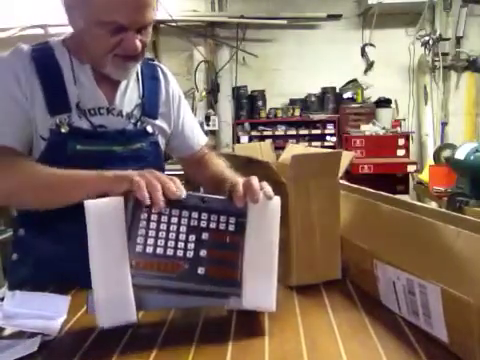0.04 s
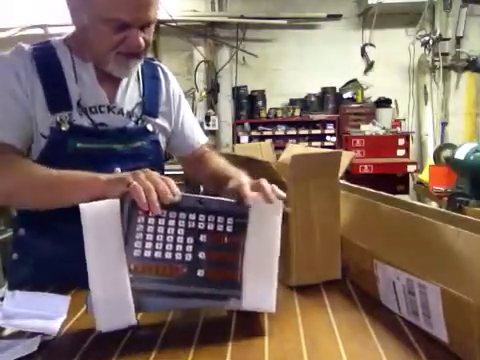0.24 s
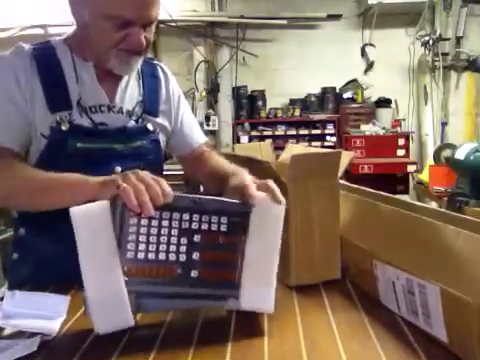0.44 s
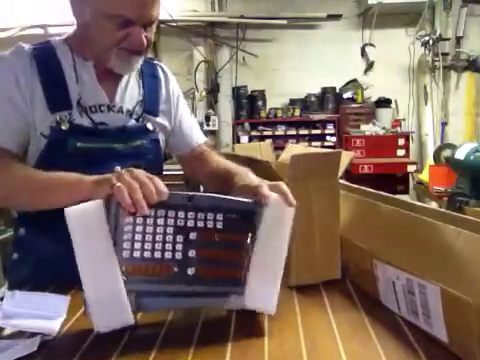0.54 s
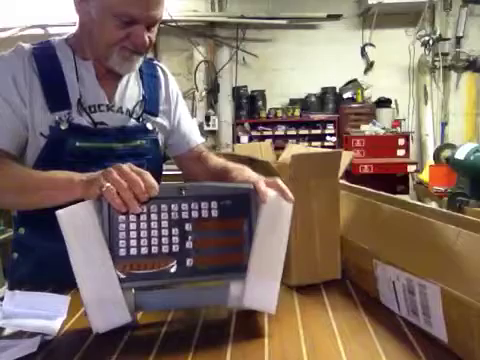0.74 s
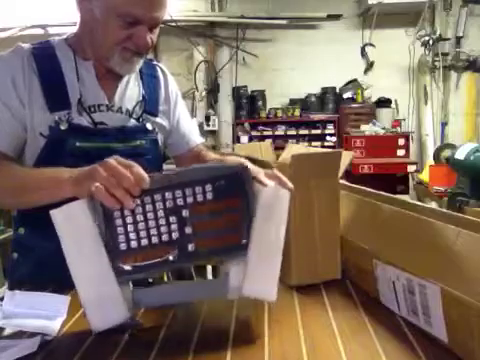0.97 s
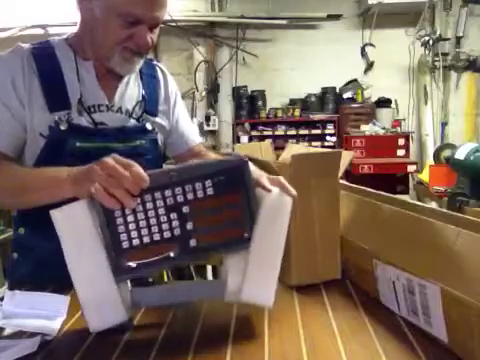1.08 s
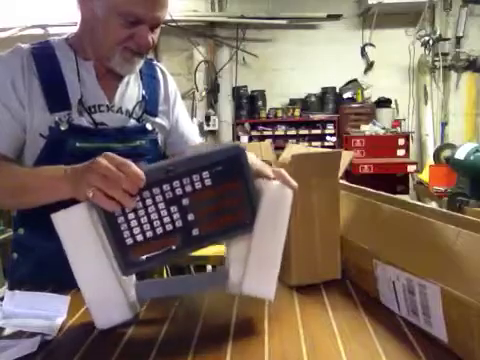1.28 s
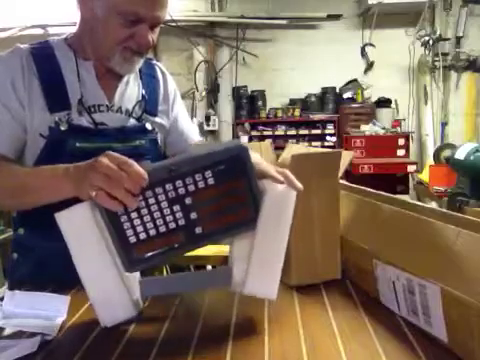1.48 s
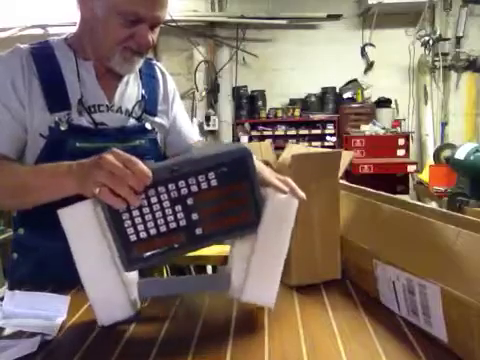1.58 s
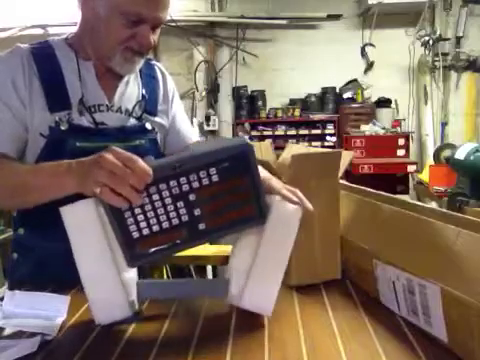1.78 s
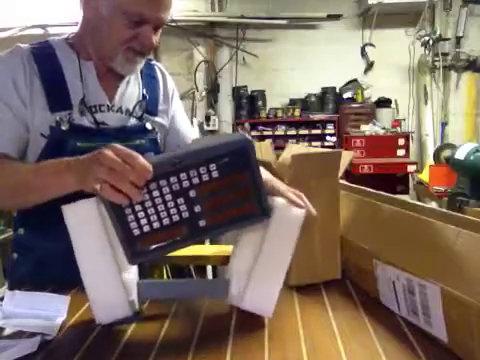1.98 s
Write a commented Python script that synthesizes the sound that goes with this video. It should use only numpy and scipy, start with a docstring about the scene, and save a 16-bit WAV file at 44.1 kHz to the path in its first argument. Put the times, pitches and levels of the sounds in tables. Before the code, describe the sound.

Foam end caps scrape and hiss against a plastic device while hands shift their grip. A sharp knock midway leads to a low judder, thin squeaks and more rubbing, over a quiet steady background in a small room.

```python
"""Foam rubs in short strokes, with soft bumps and shuffling hands, as a plastic-cased device is
worked out of two foam end caps over a workshop bench. Slipping foam cells rasp, hiss and ring
the caps. The case comes free with one sharp knock, then sticks and slips along the foam,
juddering, ringing and squeaking thinly. A small room answers, over a quiet steady background."""
import sys
import numpy as np
from scipy import signal
from scipy.fft import rfft, irfft, next_fast_len
from scipy.io import wavfile
from scipy.ndimage import map_coordinates

SR = 44100
rng = np.random.default_rng(int(sys.argv[2]) if len(sys.argv) > 2 else 0)


def waveform_to_disk(signal):
    """Save audio, clipped to [-1, 1], as 16-bit WAV at the path in sys.argv[1]."""
    frames = np.transpose(np.atleast_2d(signal))
    scaled = np.clip(frames, -1, 1) * 32767
    samples = np.round(scaled).astype(np.int16)
    wavfile.write(sys.argv[1], SR, samples)


N = 89082


def amp(db):
    """Decibels to gain."""
    return 10 ** (np.asarray(db) / 20)


def unit(x):
    """Scale to rms 1."""
    return x / np.sqrt(np.mean(x ** 2) + 1e-20)


def along(points, hz):
    """Interpolate (Hz, value) points on a log frequency axis."""
    knots_hz, values = np.transpose(points)
    return np.interp(np.log(hz + 1), np.log(knots_hz + 1), values)


def filtered(x, response):
    """Apply a gain given as a function of Hz."""
    size = next_fast_len(len(x) + SR // 2)
    return irfft(rfft(x, size) * response(np.fft.rfftfreq(size, 1 / SR)), size)[:len(x)]


def coloured(x, spectrum):
    """x shaped by (Hz, dB) points, at rms 1."""
    return unit(filtered(x, lambda hz: amp(along(spectrum, hz))))


def resonate(x, peaks):
    """x through (Hz, width Hz, dB) resonances, at rms 1."""
    def response(f):
        return sum(amp(db) * 1j * f * width / (hz * hz - f * f + 1j * f * width)
                   for hz, width, db in peaks)
    return unit(filtered(x, response))


def cut(x, hz, kind, order):
    """Causal low-pass or high-pass."""
    return signal.sosfilt(signal.butter(order, hz, kind, fs=SR, output="sos"), x)


def wobble(per_s):
    """Smooth random curve, per_s knots a second."""
    knots = rng.standard_normal(int(N * per_s / SR) + 4)
    return map_coordinates(knots, [np.arange(N) * per_s / SR])


def slips(per_s, spread_db):
    """Friction as irregular impulses of scattered size."""
    slipping = rng.random(N) < per_s / SR
    return slipping * rng.choice([-1, 1], N) * amp(spread_db * rng.standard_normal(N))


def swell(peak_s, rise_s, fall_s, steepness=1.24):
    """Rounded envelope, 9 dB down at rise_s before and fall_s after its peak."""
    offset_s = np.arange(N) / SR - peak_s
    distance = np.abs(1.525 * offset_s / np.where(offset_s < 0, rise_s, fall_s))
    return 1 / np.cosh(np.minimum(distance ** steepness, 20))


# Foam strokes. Each row: peak, rise and fall in seconds, rasp level in dB, hiss level in dB.
STROKES = [(0.0, .03, 0.034, -56, -58), (0.214, 0.064, 0.13, -49.5, -53),
           (0.353, 0.032, .033, -44.5, -45.5), (0.547, 0.077, 0.064, -42.5, -45.5),
           (.755, 0.097, 0.061, -48.5, -54.5), (0.766, 0.0032, 0.0094, -47, -46.5),
           (0.892, 0.038, 0.076, -56.5, -62), (1.02, 0.07, 0.11, -45, -48.5),
           (1.27, 0.3, 0.038, -48.5, -71), (1.36, 0.031, 0.027, -46, -50), (1.62, 0.066, 0.053, -58, -63),
           (1.766, 0.077, 0.043, -46, -56.5), (1.915, 0.013, 0.037, -61.5, -60),
           (2.01, 0.083, 0.065, -54, -78)]
# Foam friction spectra. Each row: frequency in Hz, level in dB.
RASP_SPECTRUM = [(80, -40), (170, -15), (380, -2.5), (950, 4), (1600, 0), (2200, -2.5), (3100, -3),
                 (4200, -14), (6500, -13.5), (9000, -21), (15000, -26)]
HISS_SPECTRUM = [(300, -73), (1500, -28), (3200, 6), (6500, 4.5), (8500, 0.5), (12000, -0.5), (15500, -1.5)]
# Foam cap modes. Each row: frequency in Hz, level in dB, t60 in seconds.
CAP_MODES = [(253, -13.5, 0.69), (379.4, 1.5, 0.16), (626, -3, 0.13), (705.6, -9.5, 0.21),
             (1071, -14, 0.056), (1350, -7, 0.45), (1370, -4.5, 0.043), (1570, -6, 0.15), (1766, -2, 0.15)]
CELL_SLIPS_PER_S, CELL_SPREAD_DB = 9000, 3.5


def foam_strokes():
    """Each stroke is a cloud of slipping cells: a coarse rasp that rings the caps, and a fine hiss."""
    def cells():
        return slips(CELL_SLIPS_PER_S, CELL_SPREAD_DB)
    rasp_level = np.sqrt(sum((amp(db) * swell(*timing)) ** 2 for *timing, db, _ in STROKES))
    hiss_level = np.sqrt(sum((amp(db) * swell(*timing)) ** 2 for *timing, _, db in STROKES))
    cap_peaks = [(hz, np.log(1000) / (np.pi * t60_s), db) for hz, db, t60_s in CAP_MODES]
    ring = resonate(cells(), cap_peaks)
    rasp = unit(coloured(cells(), RASP_SPECTRUM) + amp(-9) * ring)
    uneven_hand = amp(0.74 * wobble(per_s=70))
    hiss = coloured(cells(), HISS_SPECTRUM)
    return uneven_hand * (rasp_level * rasp + hiss_level * hiss)


def ringing(modes, t, build_cycles=0.56):
    """Each struck mode builds up over a cycle or so, then dies away."""
    out = np.zeros(len(t))
    for hz, db, t60_s in modes:
        decay = amp(db + rng.normal(0, 1) - 60 * t / t60_s)
        build = 1 - np.exp(-t * hz / build_cycles)
        out += decay * build * np.sin(2 * np.pi * (hz * t + rng.random()))
    return out


# Contact noise spectrum. Each row: frequency in Hz, level in dB.
CONTACT_SPECTRUM = [(70, -32), (140, -7.5), (350, -4.5), (700, -2.5), (1200, -7), (2200, -7.5), (3100, -8),
                    (3900, -19), (6000, -18), (12000, -62)]
RING_DB, RATTLE_DB, CRACK_DB = -6.5, -6.5, 2.5
RATTLE_T60_S, CRACK_T60_S = 0.14, 0.017


def strike(events, modes):
    """Each blow cracks, rings the object and rattles it briefly; a cushioned contact is duller."""
    out = np.zeros(N + SR)
    t = np.arange(SR // 2) / SR
    for start_s, db, cutoff_hz, ring_trim_db, rattle_trim_db in events:
        ring = amp(RING_DB + ring_trim_db) * ringing(modes, t)
        rattle = amp(RATTLE_DB + rattle_trim_db - 60 * t / RATTLE_T60_S)
        crack = amp(CRACK_DB - 60 * t / CRACK_T60_S) * cutoff_hz / (cutoff_hz + 2000)
        hit = ring + (rattle + crack) * coloured(rng.standard_normal(len(t)), CONTACT_SPECTRUM)
        out[round(start_s * SR):][:len(t)] += amp(db) * cut(hit, cutoff_hz, "low", order=2)
    return out[:N]


# Cap taps. Each row: start in seconds, gain in dB, cutoff in Hz, ring and rattle trims in dB.
TAPS = [(.1275, -33, 2170, 0, -6), (.137, -39, 600, -22, -1), (.151, -36.5, 450, -11, 4.5)]


def cap_taps():
    """A foam cap bumps the bench and rings."""
    return strike(TAPS, CAP_MODES)


# Grip shifts. Each row: peak, rise and fall in seconds, level in dB.
SHUFFLES = [(.22, 0.016, 0.2, -60), (0.711, 0.035, 0.018, -51.5), (.91, 0.019, 0.017, -49.5),
            (1.02, 0.011, 0.028, -43), (1.505, 0.022, 0.028, -57), (1.63, 0.061, 0.06, -54.5),
            (1.775, 0.049, 0.062, -53), (2.01, 0.044, .04, -55.5)]
# Hand friction spectrum. Each row: frequency in Hz, level in dB.
SHUFFLE_SPECTRUM = [(70, -43), (140, -1.5), (200, 2), (350, -1.5), (550, 2.5), (900, -17), (2500, -48),
                    (8000, -63)]
COARSE_SLIPS_PER_S, COARSE_SPREAD_DB = 600, 1.5


def hand_shuffle(ring_hz=258, width_hz=14):
    """The hands shift their grip: soft low friction, with a low ring of the case in it."""
    level = sum(amp(db) * swell(*timing) for *timing, db in SHUFFLES)
    ring = resonate(rng.standard_normal(N), [(ring_hz, width_hz, 0)])
    friction = coloured(slips(COARSE_SLIPS_PER_S, COARSE_SPREAD_DB), SHUFFLE_SPECTRUM)
    return level * unit(friction + amp(-3.5) * ring)


def hollow_cap(hz=387, width_hz=29):
    """Rubbing drives the gripped cap's main resonance into a brief hollow drone."""
    drone = resonate(slips(CELL_SLIPS_PER_S, CELL_SPREAD_DB), [(hz, width_hz, 0)])
    return amp(-56.5) * swell(peak_s=0.54, rise_s=0.03, fall_s=0.02) * drone


# Case blows. Each row: start in seconds, gain in dB, cutoff in Hz, ring and rattle trims in dB.
KNOCKS = [(.8625, -36, 644, -3.5, -1), (0.986, -26.5, 760, -2, -3.5), (1.0622, -18.5, 3630, 2.5, -6.5),
          (1.0652, -15.5, 804, -22, -5), (1.0845, -29.5, 2800, -26, 3), (1.0915, -23.5, 550, -24, 0.5),
          (1.209, -37.5, 556, -5, 10), (1.301, -31.5, 403, -1.5, 8), (1.381, -27, 700, -6.5, 0)]
# Case modes. Each row: frequency in Hz, level in dB, t60 in seconds.
CASE_MODES = [(206, -14, 0.36), (258.4, -10, 0.5), (315, -3.5, 0.16), (346.2, -5, 0.24), (382.5, -2, 0.13),
              (426, -5.5, 0.15), (470.7, -4, 0.21), (617, -2.5, 0.11), (730.6, -5, 0.14), (783, -7, .15),
              (947, -2, 0.076), (1430, -4, 0.047), (2530, -25, 0.069), (2934, -2, 0.032), (3013, -2, 0.026)]


def case_knocks():
    """Blows ring the plastic case, sharpest as it comes free."""
    return strike(KNOCKS, CASE_MODES)


# Judder envelope. Each row: time in seconds, level in dB.
JUDDER_LEVELS = [(1.06, -70), (1.12, -35), (1.17, -40), (1.22, -41), (1.3, -41), (1.35, -43.5),
                 (1.401, -39), (1.456, -46), (1.475, -64), (1.55, -86)]
# Low case resonances. Each row: frequency in Hz, width in Hz, level in dB.
JUDDER_PEAKS = [(172.5, 15, -17), (203.5, 22, -5), (251, 5.4, 8), (351, 19.6, 8.5), (450, 60, -12.5),
                (609.3, 10.7, 4), (770, 47, -23.5), (977.6, 13, -0.5)]


def case_judder():
    """The case sticks and slips along the foam, shaking its low resonances."""
    level_db = np.interp(np.arange(N) / SR, *np.transpose(JUDDER_LEVELS))
    return amp(level_db) * resonate(slips(COARSE_SLIPS_PER_S, COARSE_SPREAD_DB), JUDDER_PEAKS)


# Squeaks. Each row: peak, rise and fall in seconds, pitch in Hz, filter half-width in Hz, level in dB.
SQUEAKS = [(1.125, 0.038, 0.12, 2925, 80, -48.5), (1.294, 0.051, 0.11, 2456, 150, -50.5),
           (1.243, 0.14, 0.12, 4550, 1700, -55)]


def foam_squeaks(flutter_db=1.5):
    """Foam squeaks thinly on plastic: fluttering bands of noise."""
    out = np.zeros(N)
    for *timing, hz, half_width_hz, db in SQUEAKS:
        band = [(hz, 2 * half_width_hz, 0)]
        grip = amp(db + flutter_db * wobble(per_s=90))
        squeak = resonate(resonate(rng.standard_normal(N), band), band)
        out += grip * swell(*timing) * squeak
    return out


# Room decay. Each row: frequency in Hz, t60 in seconds.
ROOM_DECAY = [(150, 0.33), (1000, 0.44), (4000, 0.4), (12000, 0.21)]


def room(x, delay_s=0.006):
    """The workshop's reflections: a noise tail, shortest in the high treble."""
    hz, t, spectra = signal.stft(rng.standard_normal(SR // 2), SR, nperseg=256)
    decay = amp(-60 * t / along(ROOM_DECAY, hz)[:, None])
    _, tail = signal.istft(spectra * decay, SR, nperseg=256)
    delayed = np.pad(x, (round(delay_s * SR), 0))
    return signal.fftconvolve(delayed, tail / np.linalg.norm(tail))[:N]


# Background spectrum. Each row: frequency in Hz, level in dB.
BACKGROUND_SPECTRUM = [(25, -22), (55, -35), (95, -18.5), (140, -2), (260, -0.5), (450, 0), (1000, -12),
                       (2200, -12.5), (5000, -16.5), (15000, -19.5)]


def background():
    """Quiet steady noise, mostly low in pitch."""
    return amp(-60.5) * coloured(rng.standard_normal(N), BACKGROUND_SPECTRUM)


def scene():
    """Handling sounds, thin in the bass, with their room over the background; mono."""
    rubbing = foam_strokes() + hollow_cap() + hand_shuffle() + case_judder() + foam_squeaks()
    impacts = cap_taps() + case_knocks()
    direct = cut(rubbing + impacts, hz=130, kind="high", order=5)
    return (direct + amp(-11) * room(direct) + background())[None]


def record(dry):
    """Remove everything above the band limit."""
    top_hz = 15450
    return np.array([filtered(x, lambda hz: hz < top_hz) for x in dry])


dry = scene()
out = record(dry)
waveform_to_disk(out)
```